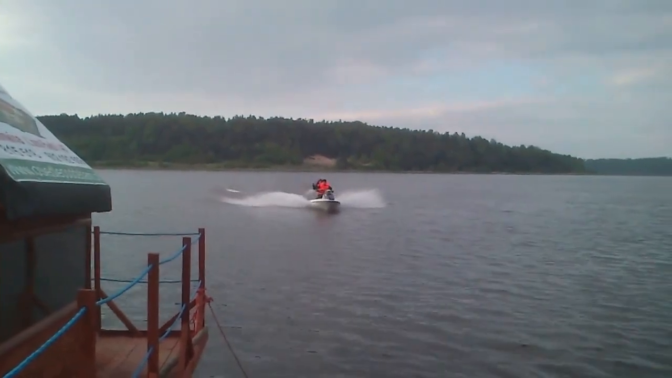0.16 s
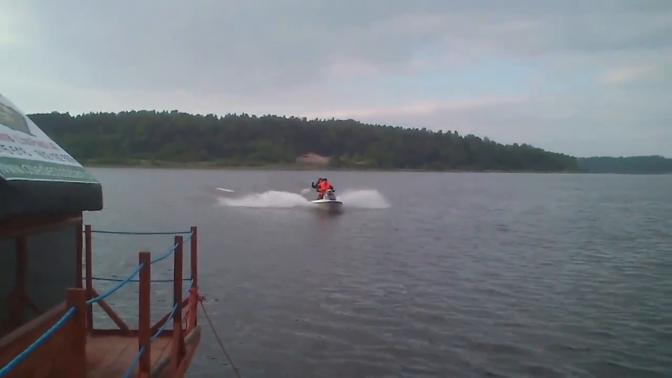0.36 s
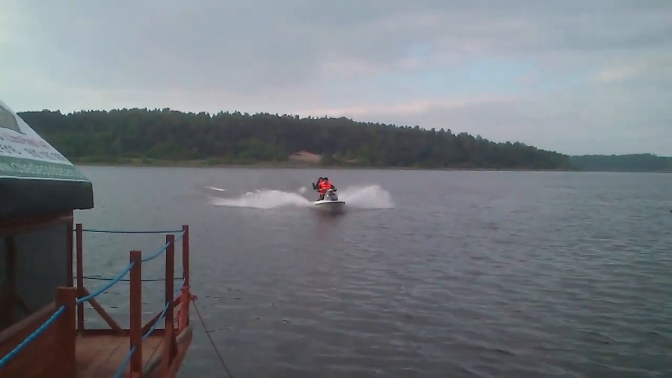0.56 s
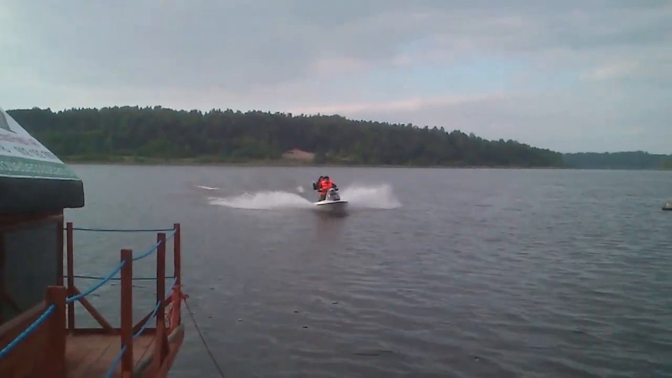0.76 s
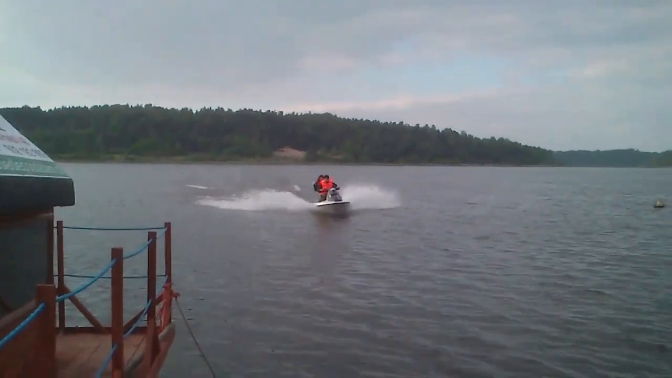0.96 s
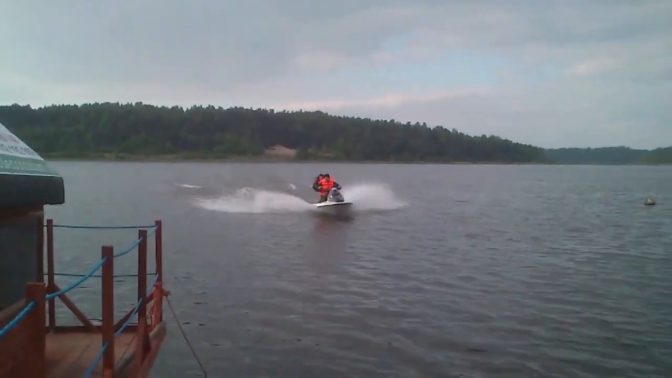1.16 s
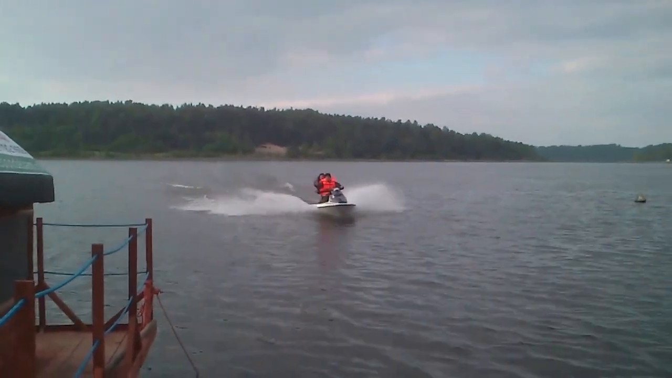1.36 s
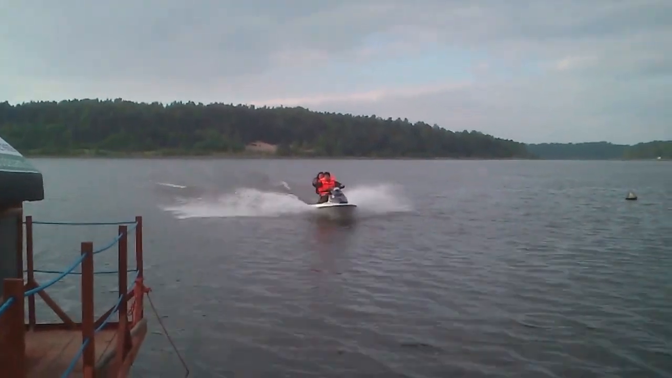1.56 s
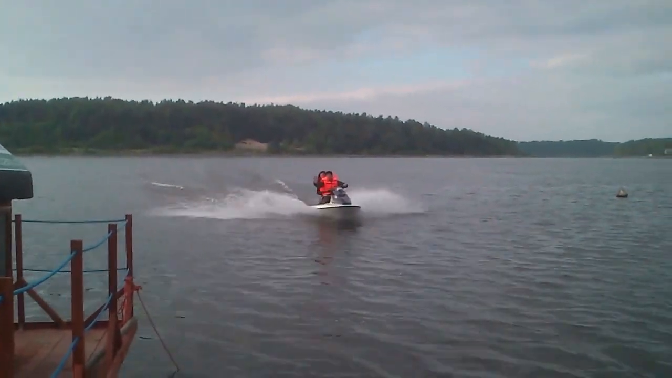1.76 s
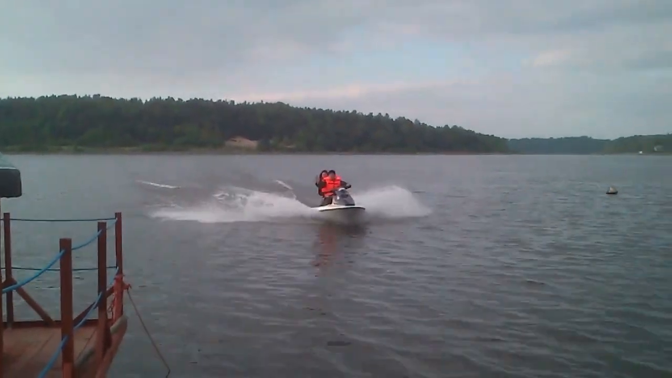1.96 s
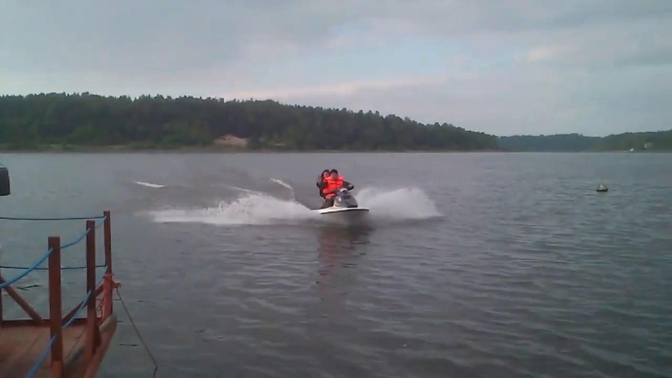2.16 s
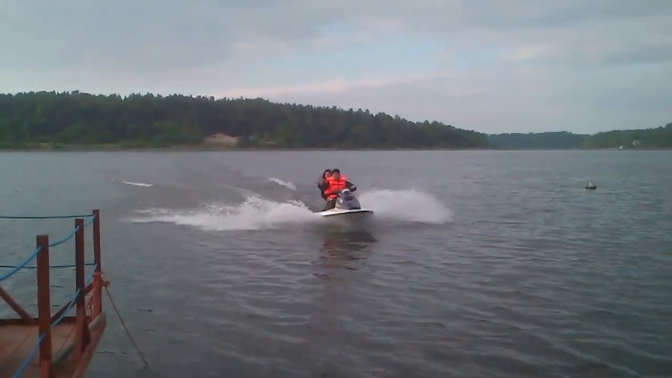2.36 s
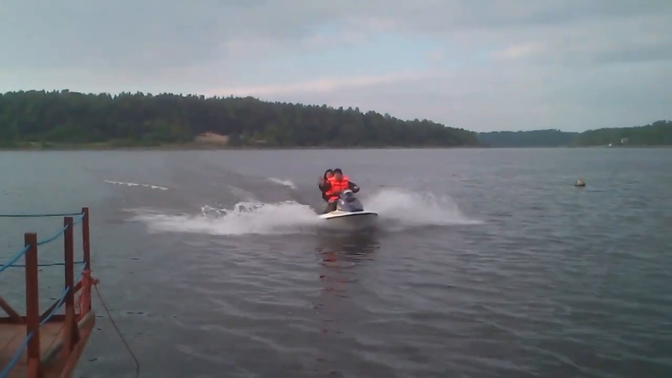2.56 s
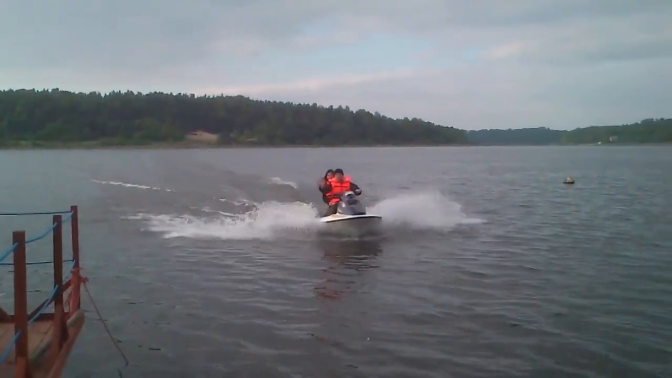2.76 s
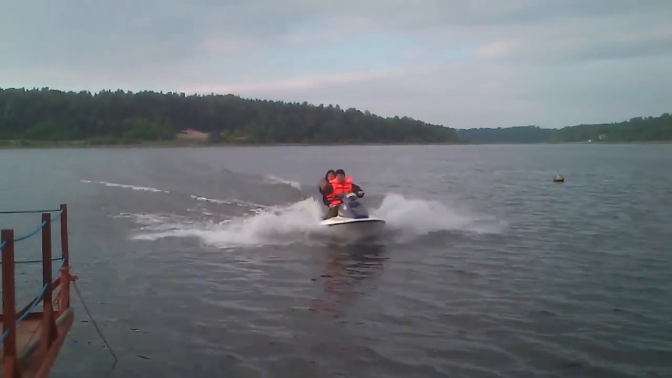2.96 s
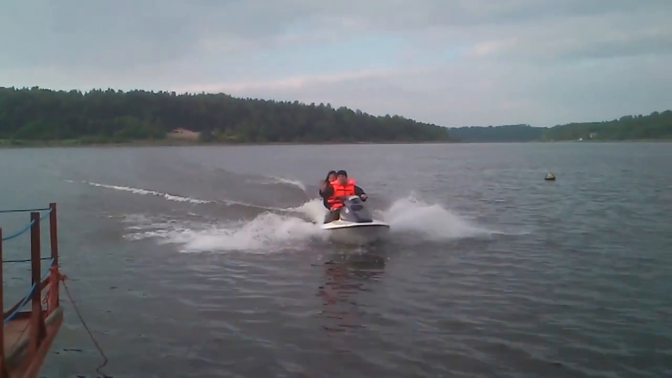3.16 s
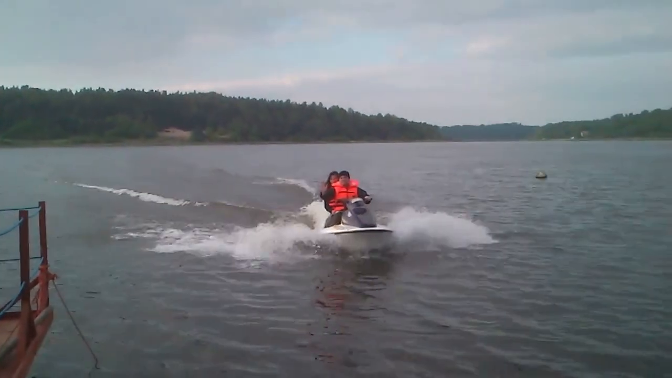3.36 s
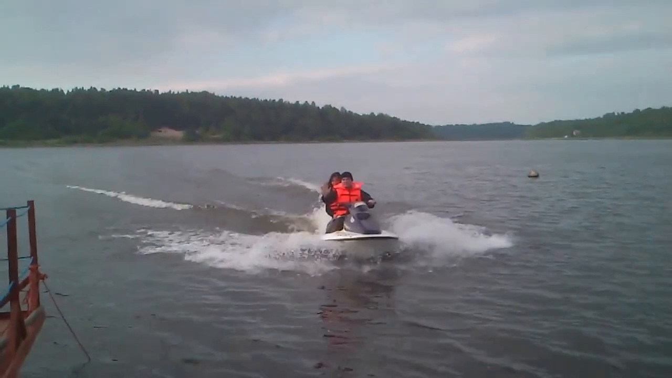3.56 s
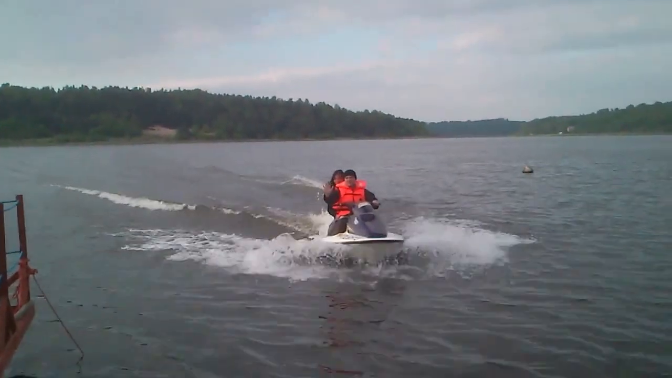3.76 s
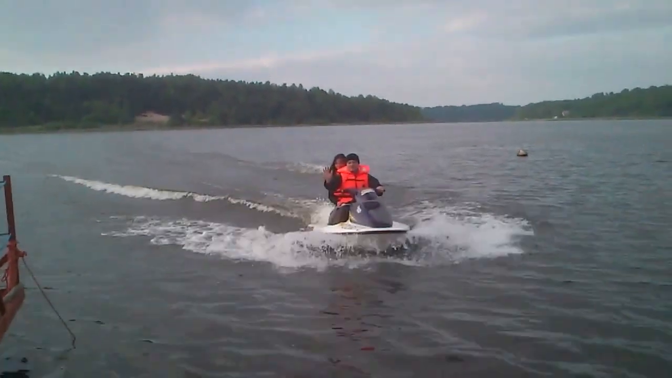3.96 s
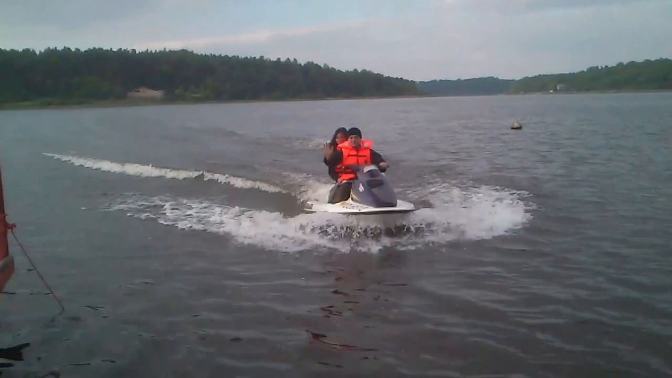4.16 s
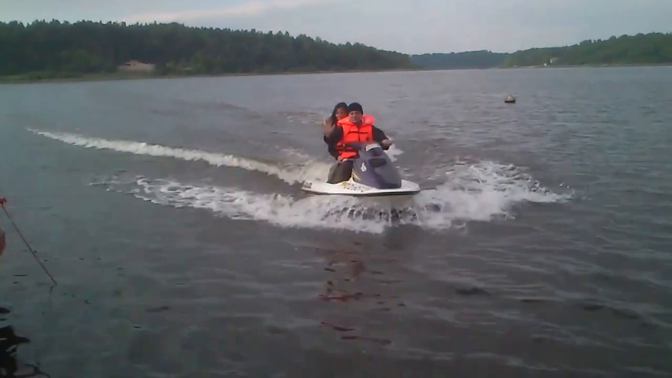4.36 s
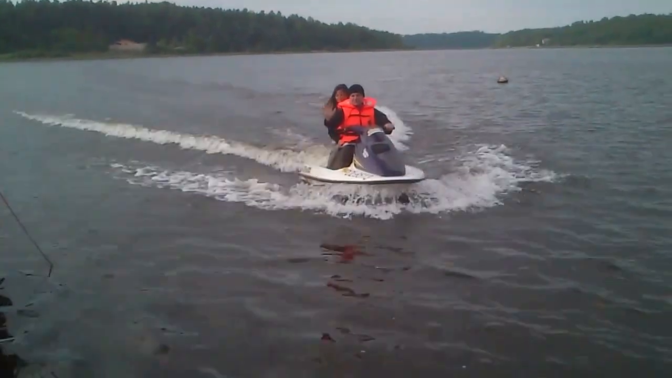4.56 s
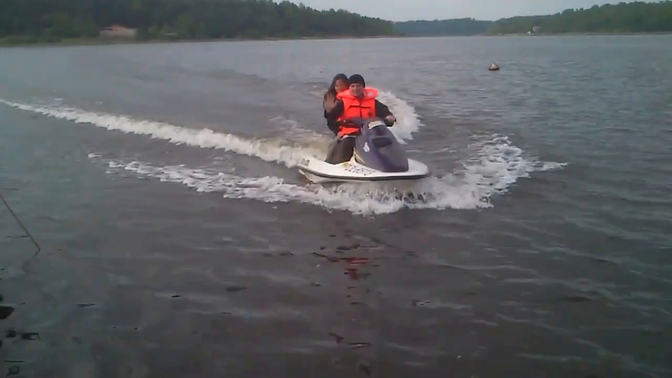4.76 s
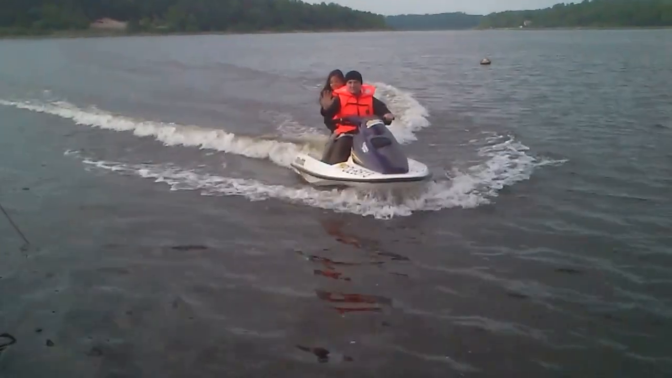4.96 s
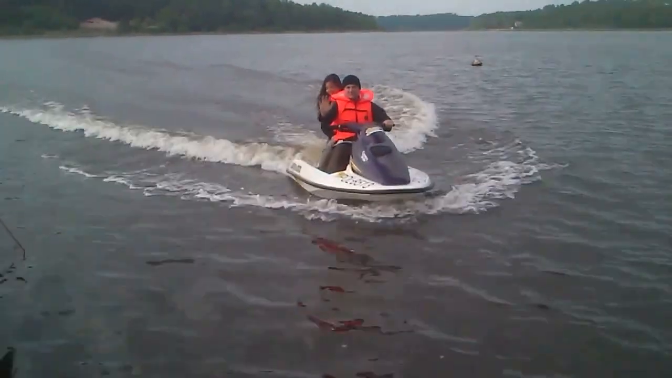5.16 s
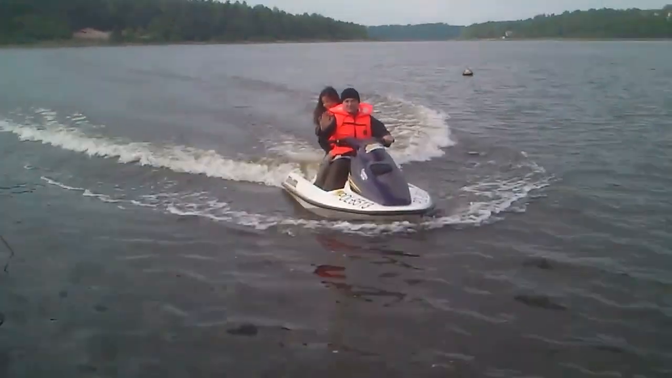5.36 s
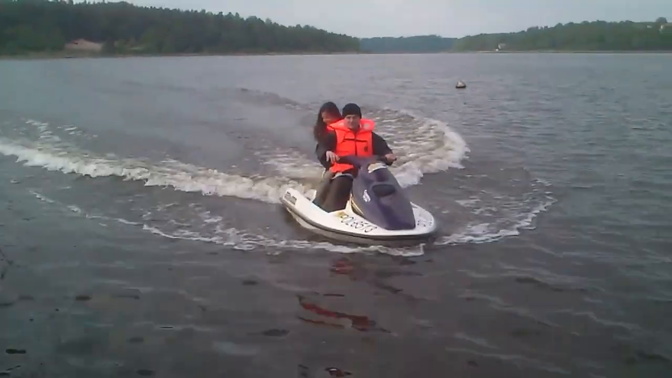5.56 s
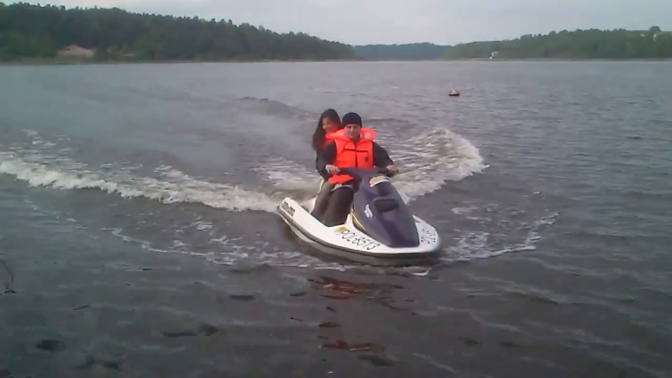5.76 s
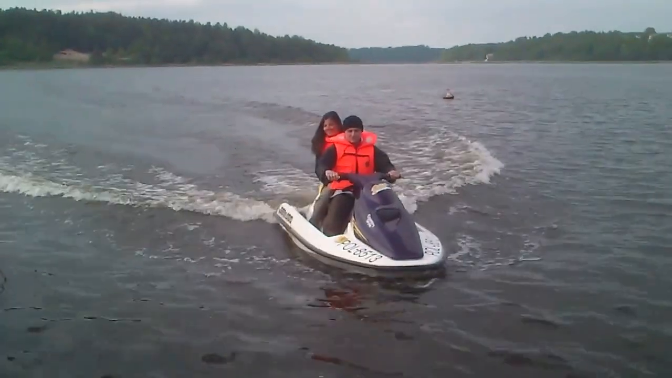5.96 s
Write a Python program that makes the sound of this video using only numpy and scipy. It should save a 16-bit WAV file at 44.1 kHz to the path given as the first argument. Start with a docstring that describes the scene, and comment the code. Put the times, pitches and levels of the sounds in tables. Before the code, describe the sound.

Outdoors over open water, a stereo microphone is struck by wind. From 0 to about 1.5 s, dense gusts thud, flap and pop sharply on the left, strongest around 0.4-0.8 and 1.1-1.2 s, over low breeze rumble in both channels. Beneath lies the faint, fast, even drone of a distant two-stroke watercraft. From about 0.6 s its pitch falls, steeply between 1 and 2 s, settling into a low, ragged idle. Isolated wind thumps continue until about 2.4 s, then mostly cease. From 2 to 5 s the burbling exhaust grows nearer and louder, repeatedly choked for an instant by waves. Broad churning wash and brighter, hissing spray swell, fullest around 3-4.5 s, leaning left. Low gurgling slop joins after 3.4 s. Around 5.2 s the exhaust dulls and fades quickly, submerged by 5.6 s, with one weak gust; softened water and breeze remain to about 6 s.

```python
"""Wind thuds on the left microphone port over the faint, fast note of a distant two-stroke watercraft.
The craft drops from full speed to idle and nears; its exhaust, crank harmonics through a resonator, burbles.
Filtered noise and random drops make the hull's wash and spray, which swell and sink; low slop joins late.
Gusts are bursts of noise bands with sharp vortex pulses, over a low breeze unrelated at the two ports."""
import sys
import numpy as np
from scipy import signal
from scipy.fft import rfft, irfft
from scipy.io import wavfile
from scipy.ndimage import uniform_filter1d

SR = 44100
rng = np.random.default_rng(int(sys.argv[2]) if len(sys.argv) > 2 else 0)


def bounce(signal):
    """Save signal as a 16-bit WAV file at the path given by the first command-line argument."""
    frames = np.transpose(np.atleast_2d(signal))
    limited = np.clip(frames, -1, 1)
    pcm = np.round(limited * 32767).astype(np.int16)
    wavfile.write(sys.argv[1], SR, pcm)


N = 269010
TIME = np.arange(N) / SR  # s
BINS = np.fft.rfftfreq(N, 1 / SR)  # Hz


def exhaust(level_db=0, right_db=-1):
    """Source and filter: crank harmonics sweep through a resonance, even under load and ragged at idle."""
    # Strength of crank orders 1, 2, 3 and so on, before load and resonance; two cylinders favour
    # the second. Each entry: level in dB.
    order_levels = [0, 3, 3, 1, -4, -3, -4, -6]
    # Boom of the exhaust water box while the outlet is open. Each row: frequency in Hz, gain in dB.
    water_box = [(45, -24), (75, -20), (100, -7), (122, -2), (143, -.5), (165, -8), (195, -18), (240, -22),
                 (330, -29), (600, -39), (5000, -100)]
    flutter, jitter_turns, burble_db, pocket_db = .2, .035, -14, -8
    loaded_even_db = 7.5  # under load the two cylinders fire alike and lift the even orders
    speed = crank_speed()
    loud_db, tuning = outlet()
    idle = np.clip((90 - speed) / 42, .12, 1)
    swell_db = loud_db - uniform_filter1d(loud_db, SR // 2)
    turns = np.cumsum(speed) / SR + jitter_turns * idle * wander(11)
    note, power = np.zeros(N), np.zeros(N)
    for order, db in enumerate(order_levels, 1):
        pipe = gain_of(read(water_box, order * speed / tuning))
        even_lift_db = loaded_even_db * (1 - idle) * (order % 2 == 0)
        size = gain_of(db + even_lift_db) * pipe
        # each passing wave damps the peak of the resonance more than its flanks
        damping = gain_of(.85 * np.minimum(swell_db, 1) * idle * pipe ** 4)
        uneven = 1 + flutter * idle * (wander(24) + 1j * wander(24))
        phasor = np.exp(2j * np.pi * (order * turns + rng.random()))
        note += size * damping * (uneven * phasor).real
        power += size ** 2 / 2
    steady_note = note / np.sqrt(power)
    # gas bubbling out under the stern excites the water box resonance
    burble = gain_of(burble_db) * idle * tuning * coloured(gain_of(read(water_box, BINS)))
    pocket = gain_of(pocket_db) * idle ** 2 * gas_pocket(tuning)
    return gain_of(level_db + loud_db) * (steady_note + burble + pocket) * gain_of([[0], [right_db]])


def crank_speed():
    """Back pressure: the throttle sets the turns per second and each covering wave drags them down."""
    # Crank speed before wave drag, full throttle to idle. Each row: time in seconds, turns per second.
    throttle = [(0, 123), (.55, 118), (.75, 115), (1, 97), (1.25, 89), (1.37, 77), (1.55, 62.5), (1.72, 55),
                (1.9, 51), (2.1, 46.5), (2.35, 47.8), (2.85, 49.3), (3.2, 48), (3.5, 48.5), (4.05, 47),
                (4.4, 49), (4.7, 47.3), (5.02, 48.8), (5.17, 46.3), (5.28, 45.8), (5.38, 49.5), (5.55, 48)]
    sag_per_db = .004
    return curves(throttle)[0] * (1 - sag_per_db * wave_cover())


def wave_cover():
    """Attenuation by submersion: how many dB the passing waves take from the exhaust."""
    # Waves that briefly cover the outlet. Each row: time of deepest cover in seconds,
    # half length in seconds, depth in dB.
    crests = [(2.02, 0.052, 7), (2.304, .04, 3), (2.467, 0.037, 6), (2.691, 0.036, 6.5), (3.024, .045, 6),
              (3.19, .025, 4.5), (3.324, 0.046, 7.5), (3.634, 0.049, 6.5), (3.82, 0.023, 4),
              (4.032, 0.085, 7.5), (4.59, 0.037, 5), (4.89, 0.049, 8.5), (5.075, 0.024, 4)]
    return sum(db * np.exp(-((TIME - s) / half) ** 2) for s, half, db in crests)


def outlet():
    """Loading of a resonator: level in dB and relative tuning as the outlet nears, floods and sinks."""
    # The uncovered exhaust grows as the craft nears. Each row: time in seconds, level in dB.
    approach = [(0, -36), (1.1, -37.5), (1.38, -28), (1.6, -33.5), (1.85, -32), (2.15, -29), (2.35, -31.5),
                (2.6, -26), (2.85, -28.5), (3.35, -26.5), (3.8, -22), (4.4, -21.5), (4.75, -22.5),
                (5.15, -18.5)]
    flattening_per_db = .013  # a covered outlet rings lower
    # the stern settles: the flooding outlet rings lower and fades, then goes under
    settle_s, flood_s, flooded_tuning = 5.1, 0.3, 0.76
    sink_s, sink_db_per_s, under_s, closing_s, under_db = 5.176, 31, 5.54, 0.061, -41.5
    (near_db,) = curves(approach)
    covered_db = wave_cover()
    open_db = near_db - covered_db - sink_db_per_s * np.maximum(TIME - sink_s, 0)
    under = ramp(under_s, closing_s)
    tuning = 1 - flattening_per_db * covered_db + (flooded_tuning - 1) * ramp(settle_s, flood_s)
    return (1 - under) * open_db + under * under_db, tuning


def gas_pocket(tuning):
    """Narrow-band resonance: gas under the stern wobbles at its own pitch, sagging as the outlet floods."""
    open_hz, width_hz = 106, 8
    turns = np.cumsum(open_hz * tuning ** .2) / SR
    wobble = wander(width_hz) + 1j * wander(width_hz)
    return tuning * evened((wobble * np.exp(2j * np.pi * turns)).real)


def water(wash_db=6.0, spray_db=1, patch_db=1.2):
    """Broadband turbulence: the hull churns up a wash and throws fine spray, which fades sooner."""
    # Water thrown by the hull, before the two layer gains. Each row: time in seconds,
    # churning wash level in dB, fine spray level in dB.
    thrown = [(0, -49.5, -55), (1, -49, -50), (2, -48, -47), (3.1, -44, -43), (4.4, -41.5, -43),
              (5, -43.5, -47.5), (5.7, -45.5, -53)]
    # Spectrum of the churning wash. Each row: frequency in Hz, relative density in dB per Hz.
    wash_spectrum = [(120, 5.5), (220, 2), (380, -2), (520, 2.5), (730, -4), (900, 1.5), (1150, -3),
                     (1450, -1.5), (2100, -11.5), (2800, -17.5), (4000, -18), (9000, -58)]
    # Spectrum of the spray before loss in the air. Each row: frequency in Hz, relative density in dB per Hz.
    spray_spectrum = [(800, -12.5), (2100, -0.5), (2800, 2.5), (3600, -3), (4900, 1.5), (5800, -3.5),
                      (7000, -4.5), (9000, -8), (10000, -13), (11200, -8), (13000, -14.5), (14500, -19.5),
                      (15700, -25)]
    # while the craft is far the air takes the top off the spray; the loss fades as it nears
    far_fizz_db, nearing_s, fizz_hz = -10, 2.4, 8300
    churn_db, mist_db = curves(thrown)
    wash = splashing(wash_spectrum, drops_per_s=900, drop_share=0.34, spread_db=2.5,
                     surge_db=0.65, surge_hz=60)
    spray = splashing(spray_spectrum, drops_per_s=3200, drop_share=0.26, spread_db=3.5,
                      surge_db=0.71, surge_hz=40)
    fizz = irfft(rfft(spray) / (1 + (fizz_hz / (BINS + 1)) ** 6), N)
    fizz_gain = gain_of(far_fizz_db * (1 - ramp(0, nearing_s) ** 2))
    spray = spray + fizz * (fizz_gain - 1)
    mix = gain_of(wash_db + churn_db) * wash + gain_of(spray_db + mist_db) * spray
    return patchy(mix, patch_db)


def slop():
    """Noise of displaced water: the settling hull pushes up a low gurgle that swells in."""
    # Spectrum of the gurgle. Each row: frequency in Hz, relative density in dB per Hz.
    gurgle_spectrum = [(130, -22), (230, 1.5), (330, -2), (460, -4), (700, -11), (1500, -51)]
    level_db, start_s, rise_s = -48, 3.4, 1.6
    gurgle = splashing(gurgle_spectrum, drops_per_s=300, drop_share=.4, spread_db=2.0,
                       surge_db=1.5, surge_hz=20)
    return gain_of(level_db) * ramp(start_s, rise_s) * gurgle


def splashing(spectrum, drops_per_s, drop_share, spread_db, surge_db, surge_hz):
    """Shot noise and coherence: random drops in a surging haze, partly alike at the two ports."""
    # Coherence of the ports. Each row: frequency in Hz, left-right likeness from 0 to 1.
    likeness = [(130, .93), (300, .75), (640, .77), (1400, .66), (3100, .42), (6800, .1), (15000, .05)]
    # Phase between the ports. Each row: frequency in Hz, radians by which the left leads.
    left_lead = [(100, -1.1), (700, 0.05), (1300, 0.74), (2200, 0.94), (4000, 1.5), (6700, 2)]
    # Balance of the ports. Each row: frequency in Hz, left minus right in dB.
    tilt = [(180, 1), (350, 4), (700, 2.5), (1300, 5.5), (2400, 3.3), (4400, 4.6), (6500, 6), (8200, 11),
            (10000, 19), (12000, 28), (15000, 34)]
    surge = gain_of(surge_db * wander(surge_hz))
    share = np.clip(drop_share, 0, 1)
    fields = []
    for port in range(2):
        sizes = gain_of(spread_db * np.minimum(rng.exponential(1, N), 5)) * rng.choice([-1, 1], N)
        drops = evened(sizes * (rng.random(N) < drops_per_s / SR))
        haze = rng.standard_normal(N)
        fields.append(rfft(surge * (np.sqrt(share) * drops + np.sqrt(1 - share) * haze)))
    same = np.clip(read(likeness, BINS), 0, 1)
    lead = read(left_lead, BINS)
    shade = gain_of(-read(tilt, BINS))
    right = shade * np.exp(-1j * lead) * (same * fields[0] + np.sqrt(1 - same ** 2) * fields[1])
    centre = np.sqrt(1 + shade ** 2 + 2 * shade * same * np.cos(lead))  # gain of both ports summed
    pair = irfft(np.array([fields[0], right]) * gain_of(read(spectrum, BINS)) / centre, N)
    return pair / pair.mean(0).std()


def patchy(x, depth_db):
    """Time-varying filtering: separate sheets of water colour the sound in drifting patches."""
    z = signal.stft(x, nperseg=1024, noverlap=768)[2]
    grain = rng.standard_normal(z.shape[1:])
    across_hz = uniform_filter1d(grain, size=4, axis=0)
    patches = evened(uniform_filter1d(across_hz, size=12, axis=1))
    return signal.istft(z * gain_of(depth_db * patches), nperseg=1024, noverlap=768)[1][:, :N]


def wind_force():
    """Sum of powers: gusts on the left port rise fast, hold and fall, over weak random buffeting."""
    # Gusts on the left port. Each row: start of the hold in seconds, its length in seconds,
    # force in dB before the gains of gusts() and vortices().
    blows = [(0.016, 0.046, -24.5), (0.174, 0.034, -25), (0.235, 0.018, -24.5), (0.295, 0.031, -22.5),
             (0.38, 0.038, -21), (0.448, 0.013, -21), (0.491, 0.011, -18.5), (0.526, 0.036, -18.5),
             (0.573, 0.043, -19), (0.622, 0.06, -15), (0.698, .02, -22.5), (0.725, 0.022, -17.5),
             (0.764, 0.036, -19.5), (0.811, 0.034, -20), (.86, 0.024, -27.5), (0.922, 0.022, -24.5),
             (0.983, .03, -24.5), (1.049, 0.023, -20.5), (1.113, 0.04, -17.5), (1.152, 0.032, -13.5),
             (1.197, 0.014, -17.5), (1.28, 0.023, -21.5), (1.321, 0.016, -21.5), (1.366, 0.025, -21.5),
             (1.451, 0.047, -24), (1.779, .025, -27.5), (1.811, 0.035, -19.5), (2.09, 0.065, -26),
             (2.38, 0.073, -26), (2.859, 0.085, -36), (5.211, .04, -24.5)]
    rise_s, fall_s = 0.004, 0.011
    # weak buffeting between the gusts dies away as the wind drops
    buffet_db, buffet_db_per_s, swing_db, swing_hz = -35, -2.5, 7.5, 21
    calm_s, calming_s = 2.02, 1
    buffet = gain_of(buffet_db + buffet_db_per_s * TIME + swing_db * np.tanh(wander(swing_hz)))
    power = (buffet * (1 - ramp(calm_s, calming_s))) ** 2
    for s, length, db in blows:
        fall = np.exp(-np.maximum(TIME - s - length, 0) / fall_s)
        power += (gain_of(db) * ramp(s - rise_s, rise_s) * fall) ** 2
    return np.sqrt(power)


def gusts(force, level_db=-21.0, typical_db=-20, octaves=0.41):
    """Turbulent cascade: bursts of noise bands, the smaller eddies growing faster with the force."""
    # Eddy sizes at typical force. Each row: centre frequency in Hz, relative level in dB,
    # growth exponent of amplitude with force.
    eddies = [(66.6, -0.5, 0.66), (126.4, -1.5, 0.66), (235, -3.5, 0.77), (382, -11, 0.96),
              (644, -21.5, 1.78)]
    ragged_db = 4
    strength = force / gain_of(typical_db) * gain_of(ragged_db * np.tanh(wander(79)))
    out = np.zeros(N)
    for hz, db, growth in eddies:
        band = np.exp(-.5 * (np.log2((BINS + 1) / hz) / octaves) ** 2)
        out += gain_of(db) * strength ** growth * coloured(band)
    return gain_of(level_db) * out


def vortices(force, level_db=-1.0, core_ms=0.73):
    """Vortex shedding: big vortices thump the left port and small ones ride the wind at random."""
    # Big vortices; a narrow core sounds sharper. Each row: time in seconds,
    # core size in dB before level_db, core width in ms.
    big_vortices = [(0.021, -3, 0.96), (0.0326, -9.5, 0.69), (0.0546, -7, 0.73), (0.177, -9, 0.37),
                    (0.2001, -3, 0.83), (.212, -4, 0.79), (0.2992, -4.5, 0.76), (0.31, -6, 0.72),
                    (0.4025, -0.5, 0.59), (0.4613, -6, 0.51), (0.4947, 0, 0.47), (0.5036, 0, 0.9),
                    (.5276, -6, .55), (0.544, 0.5, 0.87), (0.588, -10, .85), (0.6099, 0, 0.53),
                    (0.6525, -3, 0.45), (0.6654, -12, 0.6), (0.6874, -14, 0.73), (0.724, -6, 0.43),
                    (.7362, -4, 0.42), (0.771, -7, 0.52), (0.793, -7, 0.57), (.8385, -6, 0.47),
                    (1.05, -4, 0.96), (1.1134, -9, 0.62), (1.1353, -2, 0.71), (1.1702, -1, 0.6),
                    (1.1817, -12, .55), (1.199, -5.5, 0.7), (1.3228, -4.5, 0.65), (1.4504, -1, 0.72),
                    (1.4848, -8, 0.81), (1.5288, -6.5, 1), (1.816, -10.5, 0.36), (1.8359, -7.5, 0.58),
                    (1.9884, -2, 1), (2.1138, -3, 0.84)]
    shed_per_s, shed_db, shed_spread_db = 130, 3, 2  # size in dB relative to the wind force
    shed = rng.random(N) < shed_per_s / SR
    peaks = force * gain_of(shed_db + shed_spread_db * rng.standard_normal(N)) * shed
    t = np.arange(-SR // 50, SR // 50 + 1) / SR
    out = signal.oaconvolve(peaks, vortex(t, core_ms), "same")
    for s, db, core in big_vortices:
        near = slice(max(round((s + t[0]) * SR), 0), round((s + t[-1]) * SR))
        out[near] += gain_of(db) * vortex(TIME[near] - s, core)
    return gain_of(level_db) * out


def vortex(t, core_ms, rebound_s=0.004):
    """Low pressure in a vortex core: a sharp dip between two shallow rises that balance its area."""
    core = (1 + (1000 * t / core_ms) ** 2 / 2) ** -2
    rebound = np.exp(-(t / rebound_s) ** 2)
    return rebound * core.sum() / rebound.sum() - core


def breeze(lumps_db=-1.0, flap_db=-4.0, flap_hz=110, flap_growth=0.46):
    """Incoherent wind noise: lumpy rumble at each port; a stiffer breeze also flaps higher up."""
    # Steady wind rumble, before lumps and flap. Each row: time in seconds, left level in dB,
    # right level in dB.
    port_levels = [(0, -22.5, -35), (.8, -29.5, -31.5), (1.25, -26.5, -30), (1.7, -22.5, -29),
                   (2.3, -26.5, -31.5), (3.6, -28, -26), (4.5, -31, -30), (5.2, -27, -22.5),
                   (5.65, -32.5, -30), (6.1, -26, -28)]
    # Slow eddies of the breeze. Each row: frequency in Hz, relative density in dB per Hz.
    slow_eddies = [(8, -6), (20, 2), (50, .5), (75, -3.5), (110, -12), (170, -21), (320, -32), (3000, -100)]
    flap_band = np.exp(-2 * np.log2((BINS + 1) / flap_hz) ** 2)
    ports = []
    for db in curves(port_levels):
        lumps = gain_of(lumps_db * np.tanh(wander(18)))
        flap_gain = gain_of(flap_db + flap_growth * np.minimum(db + 20.5, 0))
        flap = flap_gain * coloured(flap_band)
        rumble = coloured(gain_of(read(slow_eddies, BINS)))
        ports.append(gain_of(db) * lumps * (rumble + flap))
    return np.array(ports)


def gain_of(db):
    """Logarithmic level: decibels to amplitude."""
    return 10 ** (np.asarray(db) / 20)


def evened(x):
    """Normalisation: scales to rms 1."""
    return x / np.sqrt(np.mean(x ** 2) + 1e-20)


def read(points, hz):
    """Logarithmic pitch: interpolates a spectrum table on a log-frequency axis."""
    f, value = np.transpose(points)
    return np.interp(np.log(hz + 1), np.log(f + 1), value)


def curves(rows):
    """Linear interpolation: each column of a time table, at every sample."""
    s, *columns = np.transpose(rows)
    return [np.interp(TIME, s, c) for c in columns]


def ramp(start_s, length_s):
    """Linear envelope: rises evenly from 0 to 1."""
    return np.clip((TIME - start_s) / length_s, 0, 1)


def coloured(gain):
    """Spectral shaping: noise of rms 1 with the given gain per frequency."""
    return evened(irfft(rfft(rng.standard_normal(N)) * gain, N))


def wander(hz):
    """Low-passed noise: slow chance of rms 1, up to about the given rate."""
    return coloured(np.exp(-(BINS / hz) ** 2))


def scene(leak_db=-26):
    """Superposition: craft and water ahead, buffeting on the left port with a faint leak to the right."""
    force = wind_force()
    buffets = (gusts(force) + vortices(force)) * gain_of([[0], [leak_db]])
    return exhaust() + water() + slop() + breeze() + buffets


def record(dry):
    """Saturation and band limit: a soft ceiling at full scale, then a low-pass filter."""
    edge_hz = 15650
    lowpass = signal.firwin(511, edge_hz, window=("kaiser", 9), fs=SR)
    limited = dry / (1 + dry ** 8) ** (1 / 8)
    return signal.oaconvolve(limited, lowpass[None], "same", axes=1)


dry = scene()
out = record(dry)
bounce(out)
```